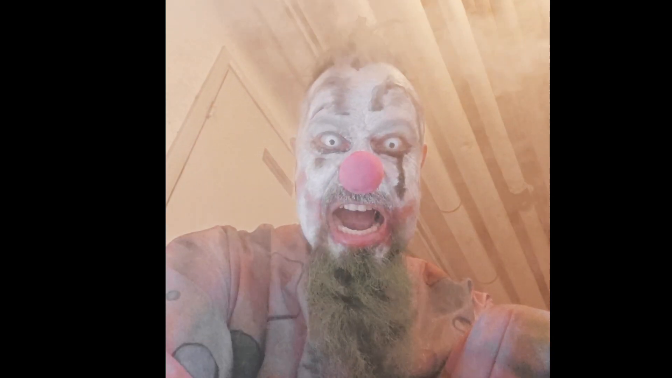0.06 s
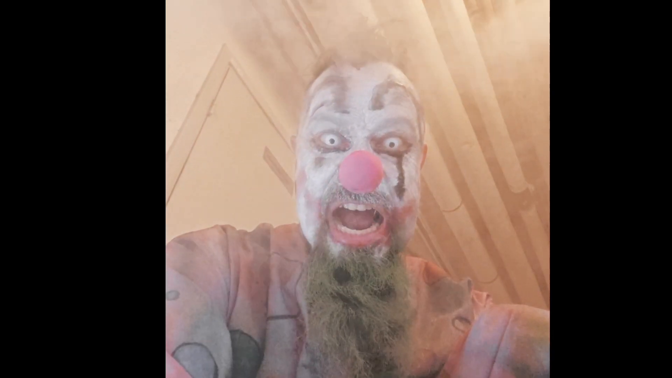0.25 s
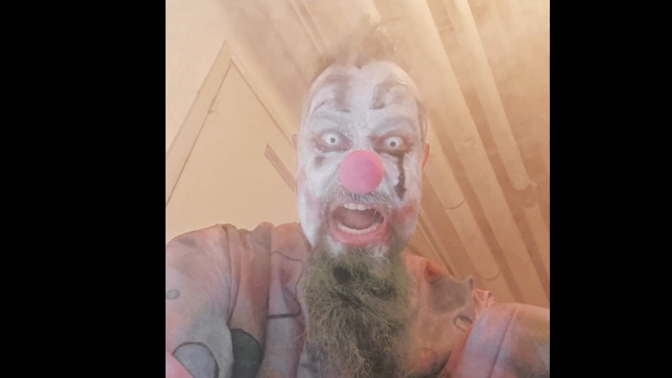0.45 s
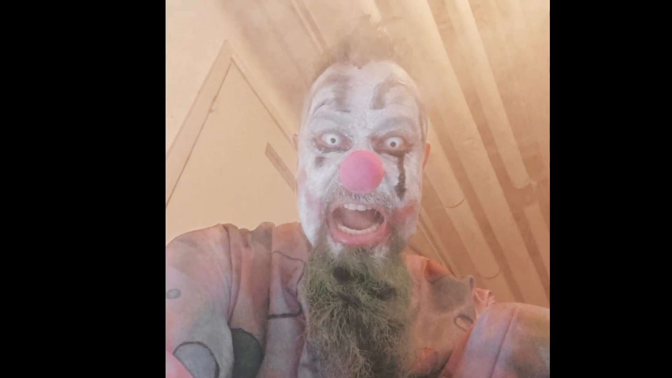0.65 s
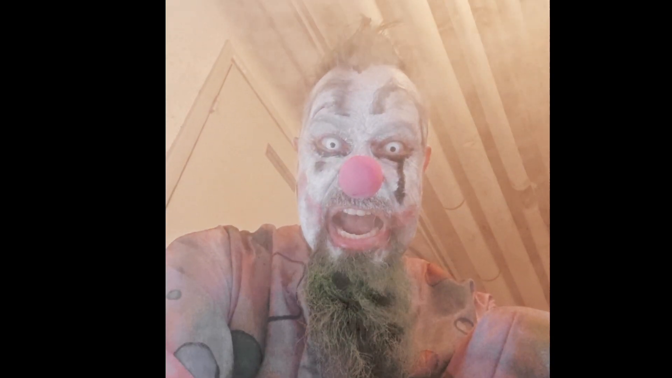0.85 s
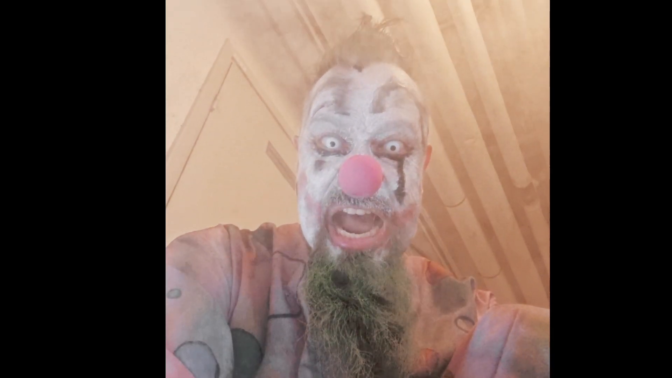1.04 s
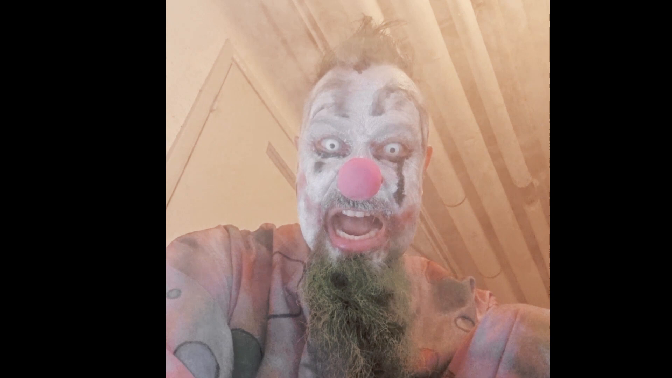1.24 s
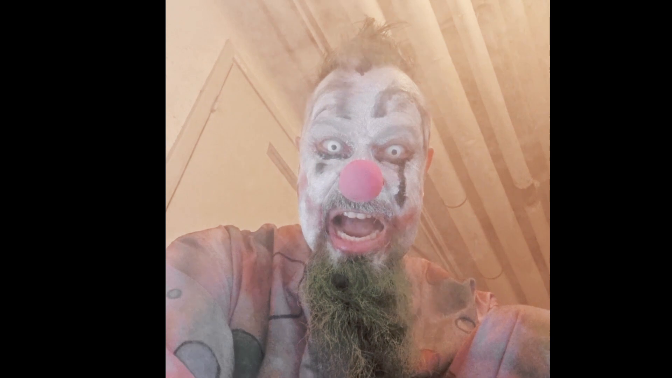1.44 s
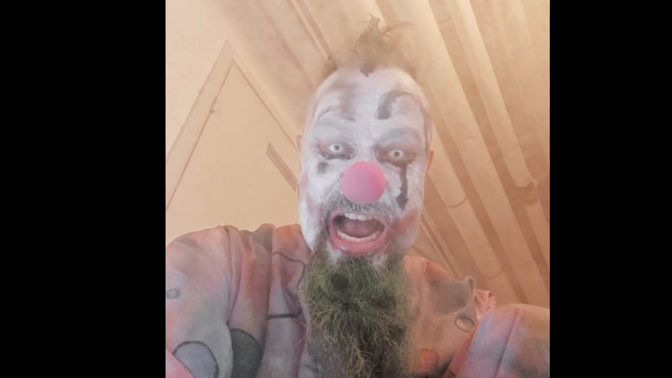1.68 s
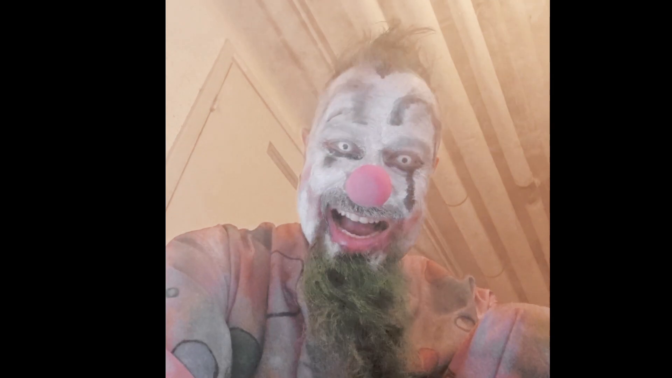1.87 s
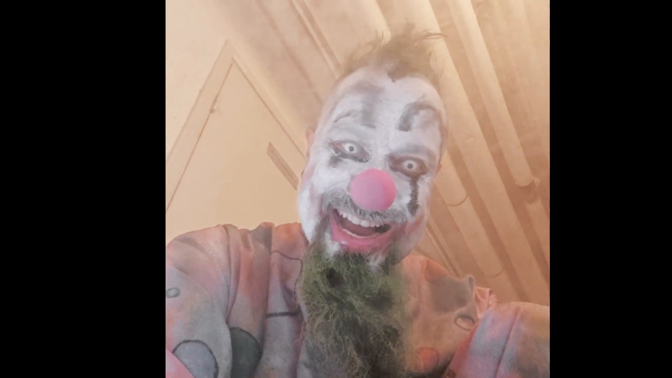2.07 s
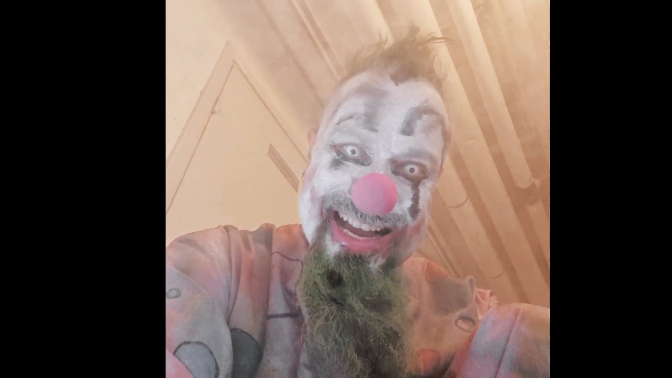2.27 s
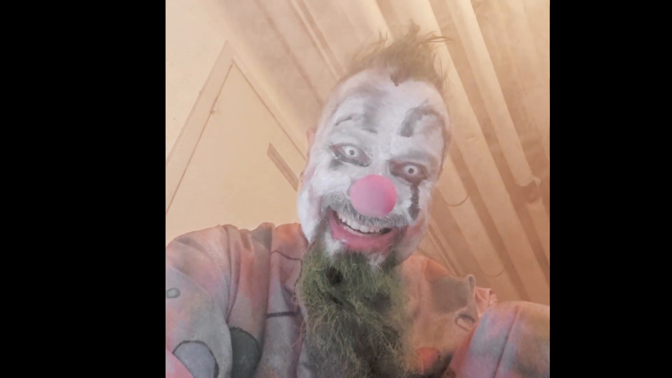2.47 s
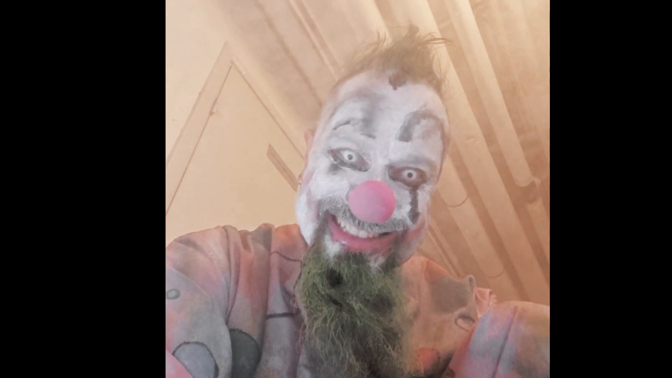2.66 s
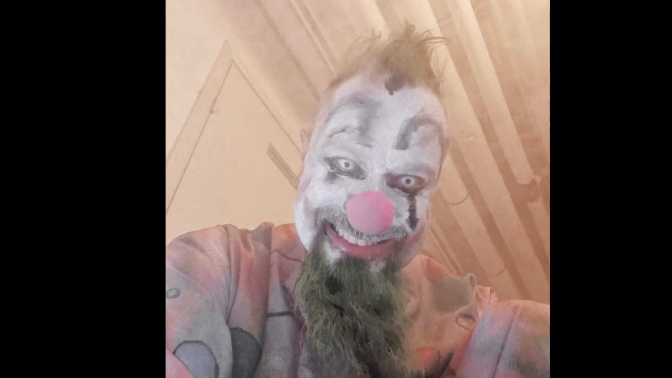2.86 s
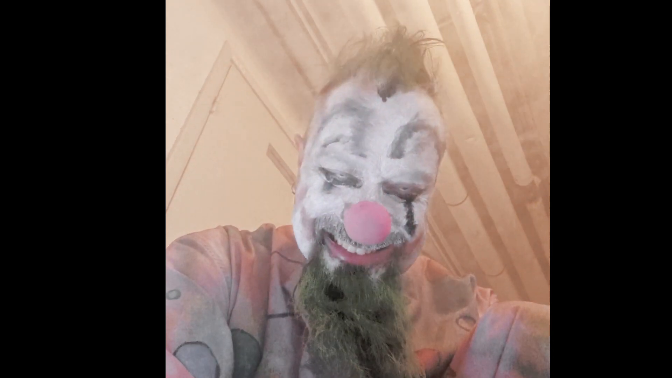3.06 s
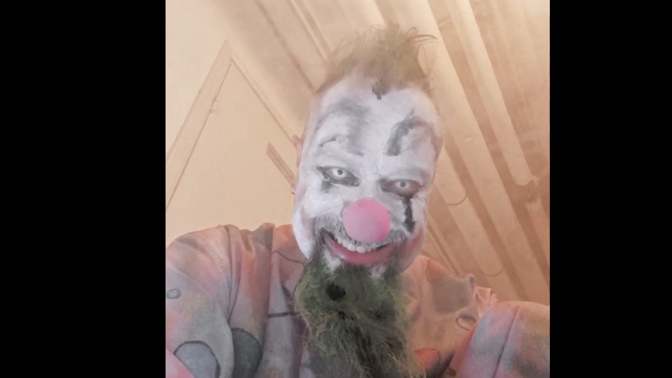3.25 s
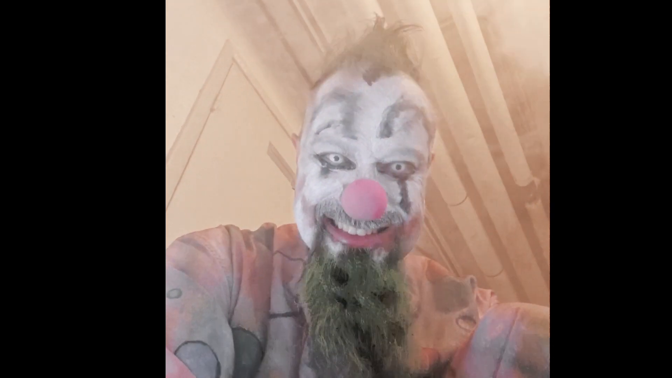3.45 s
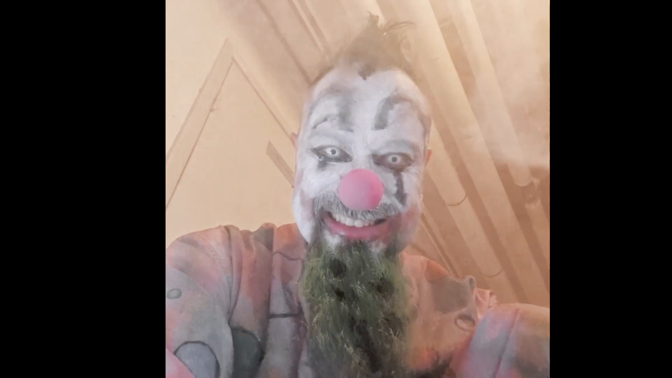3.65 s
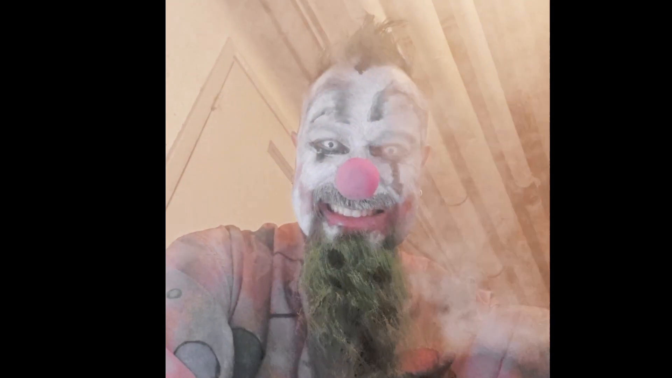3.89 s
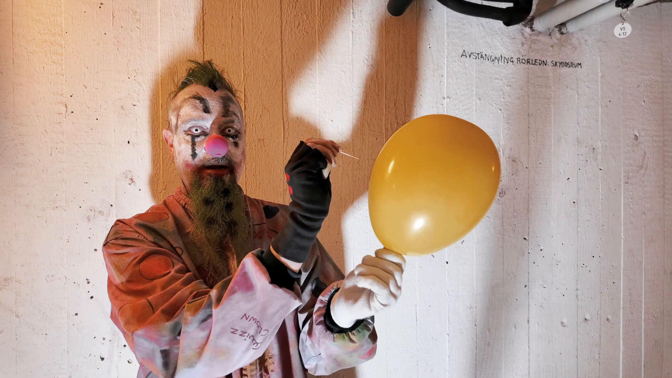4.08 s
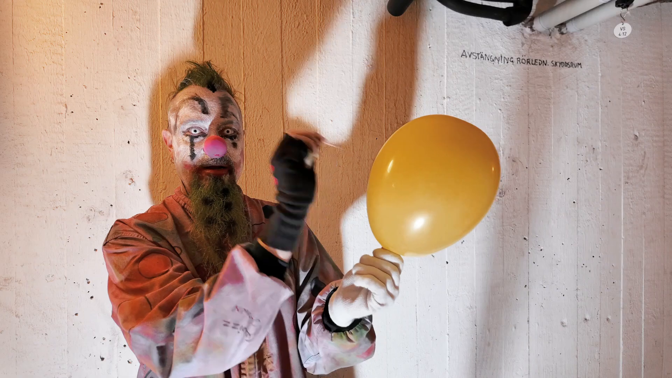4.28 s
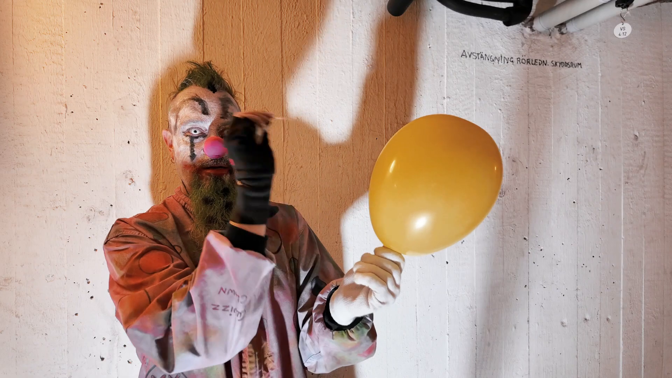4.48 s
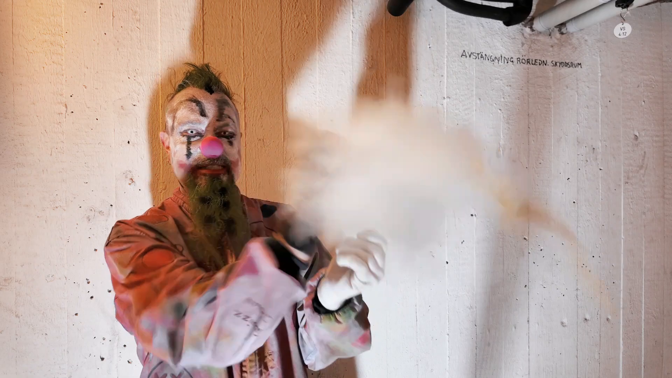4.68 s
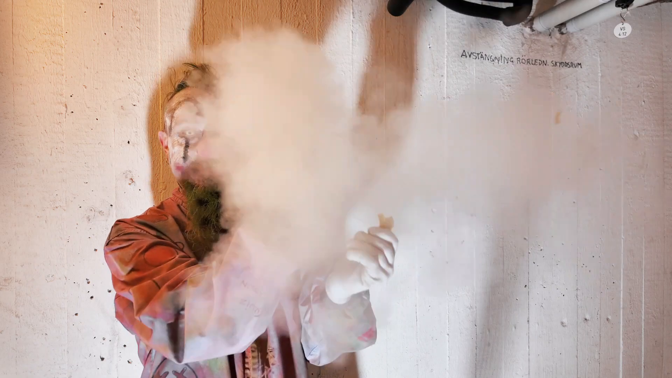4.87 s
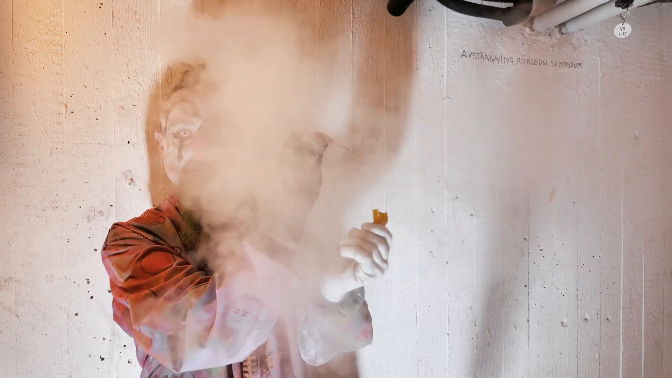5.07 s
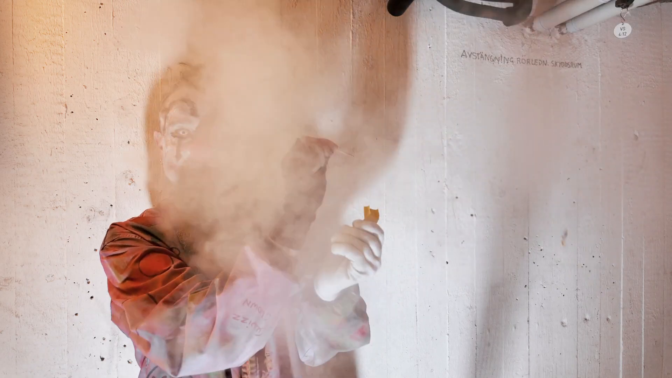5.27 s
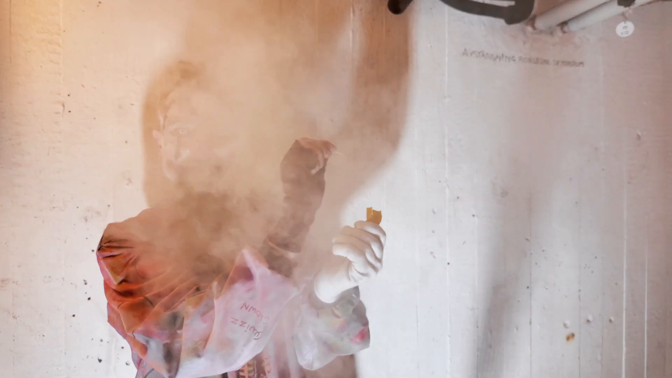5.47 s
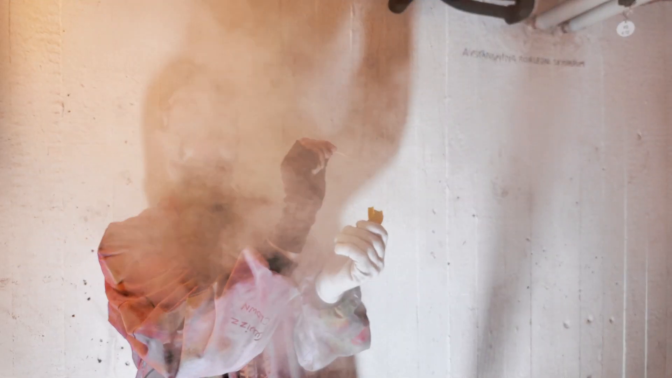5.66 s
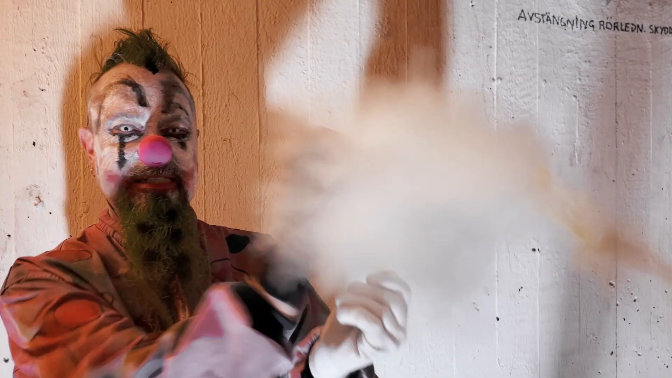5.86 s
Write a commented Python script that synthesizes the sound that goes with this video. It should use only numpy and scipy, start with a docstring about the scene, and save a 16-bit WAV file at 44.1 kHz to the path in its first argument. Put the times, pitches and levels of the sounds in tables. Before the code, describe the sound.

Steady rattling pump buzz with nozzle hiss stops abruptly; near silence, one loud balloon bang with a boomy echo, then the buzz returns.

```python
"""A quiet concrete room, and close by a handheld smoke machine, heard before and after it.
The machine's piston pump knocks about 105 times a second, as shaped harmonics, under the nozzle's filtered noise.
It swings round, turns harder in tone and is cut off dead. In the room faint narrow-band noise swells, then a
balloon bursts: noise bursts, a pressure pulse and a decaying echo that a limiter holds flat; scraps of rubber land.
Then the buzz of the machine cuts back in."""
import sys
import numpy as np
from scipy import signal
from scipy.fft import irfft, next_fast_len
from scipy.io import wavfile
from scipy.ndimage import uniform_filter1d, map_coordinates

SR = 44100
rng = np.random.default_rng(int(sys.argv[2]) if len(sys.argv) > 2 else 0)


def waveform_to_disk(signal):
    """Save audio, clipped to [-1, 1], as 16-bit WAV at the path in sys.argv[1]."""
    frames = np.transpose(np.atleast_2d(signal))
    scaled = np.clip(frames, -1, 1) * 32767
    samples = np.round(scaled).astype(np.int16)
    wavfile.write(sys.argv[1], SR, samples)


N = 261501
TIME = np.arange(N) / SR
PUMP_HZ = 105.353
BURST_S = 4.7862


def gain_of(db):
    """Decibels to an amplitude factor."""
    return 10 ** (np.asarray(db) / 20)


def evened(x):
    """Scales to rms 1."""
    return x / np.sqrt(np.mean(abs(x) ** 2) + 1e-20)


def read(points, hz):
    """Interpolates a table on a log-frequency axis."""
    point_hz, value = np.transpose(points)
    return np.interp(np.log(hz + 1), np.log(point_hz + 1), value)


def chance(*shape):
    """Complex normal numbers of rms 1."""
    return evened(rng.standard_normal(shape) + 1j * rng.standard_normal(shape))


# left-right likeness of the sound field [freq_hz, correlation]
LIKENESS = [(60, 0.99), (250, 0.97), (600, 0.87), (1300, 0.53), (2400, -0.24), (4400, 0.12), (6500, 0.19),
            (8500, 0.86), (15000, 0.87)]


def paired(fields, hz):
    """Mixes two unrelated fields into a left-right pair with the tabled likeness."""
    same = np.clip(read(LIKENESS, hz), -1, 1)
    right = same * fields[0] + np.sqrt(1 - same ** 2) * fields[1]
    return np.array([fields[0], right])


def noise(colour, count=N):
    """Stereo noise of rms 1; colour(hz) gives the relative gain."""
    size = next_fast_len(count, True)
    hz = np.fft.rfftfreq(size, 1 / SR)
    spectrum = paired(chance(2, len(hz)), hz) * colour(hz)
    return evened(irfft(spectrum, size)[:, :count])


def wavering(centre_hz, width_hz):
    """Noise in one narrow resonance: an unsteady tone."""
    return noise(lambda hz: 1 / (1 + (2 * (hz - centre_hz) / width_hz) ** 2))


def rasps(rows, low_hz):
    """Noise bursts with a linear rise and an exponential decay."""
    out = np.zeros((2, N))
    age_s = np.arange(SR // 3) / SR
    for start_s, level_db, rise_s, t60_s, corner_hz in rows:
        decay_db = -60 * np.maximum(age_s - rise_s, 0) / t60_s
        swell = np.minimum(age_s / rise_s, 1) * gain_of(level_db + decay_db)
        hiss = noise(lambda hz: hz / np.hypot(hz, low_hz) / np.hypot(1, hz / corner_hz), len(age_s))
        part = out[:, round(start_s * SR):][:, :len(age_s)]
        part += (swell * hiss)[:, :part.shape[1]]
    return out


# wash of the quiet room [freq_hz, relative_db_per_hz]
AIR = [(18, -53.5), (30, -20), (59, -10.5), (168, -8), (213, -4), (270, -8.5), (467, -17.5), (656, -17.5),
       (728, -13), (830, -19), (1020, -20), (1200, -21), (4700, -30.5), (7700, -37.5), (11500, -37.5),
       (15500, -31.5)]
AIR_DB = -66.5
# ventilation drone [centre_hz, width_hz, level_db]
DRONE = [(72, 8.7, -74.5), (131.5, 10, -68.5), (208.7, 32, -65), (657, 8, -84), (735, 9.3, -76)]


def room_air():
    """Faint broadband wash plus the wavering narrow bands of ventilation."""
    drone = sum(gain_of(level_db) * wavering(centre_hz, width_hz) for centre_hz, width_hz, level_db in DRONE)
    return gain_of(AIR_DB) * noise(lambda hz: gain_of(read(AIR, hz))) + drone


def low_drone(centre_hz=143, width_hz=14, level_db=-67):
    """Low ventilation drone under the machine, as narrow noise."""
    return gain_of(level_db) * wavering(centre_hz, width_hz)


# scraps of rubber landing [start_s, level_db, rise_s, t60_s, treble_corner_hz]
SCRAPS = [(5.168, -68.5, 0.0052, .12, 13800), (5.413, -58, 0.016, 0.078, 12050),
          (5.425, -49.5, 0.012, 0.28, 2150), (5.58, -74, 0.0048, 0.13, 14000)]


def scraps():
    """Rubber scraps land: short noise bursts thinned in the bass."""
    return rasps(SCRAPS, low_hz=1500)


# diffuse echo colour [freq_hz, relative_db_per_hz]
ECHO = [(30, -40.5), (55, -19), (75, -15), (130, -5), (230, -3), (350, -2), (520, -8), (800, -6.5),
        (1450, -4.5), (2000, -11), (2500, -12.5), (3200, -16), (6000, -21), (15000, -28.5)]
ECHO_DB = -1
# diffuse echo decay [freq_hz, t60_s]
ECHO_T60 = [(60, 1.2), (250, 1.09), (500, 1), (1000, 0.79), (1600, 0.74), (2400, 0.65), (3500, 0.58),
            (6000, 0.45), (10000, .34), (15000, 0.2)]
# standing waves between the walls [freq_hz, level_db, t60_s]
ROOM_MODES = [(124.7, -26.5, 1.7), (144.2, -16.5, 0.88), (208.1, -9, 1.07), (243.5, -11.5, 1.334),
              (324, -8, 0.83), (369, -14, 1.04), (496, -28.5, 1.4), (679, -25, 1.0), (765, -24, 1.0),
              (842, -23.5, 1.0), (1346, -25.5, 1)]


def echo(build_s=0.00072):
    """Bare walls keep the bang alive: a diffuse tail that loses its treble first, and standing waves."""
    hz, t, z = signal.stft(noise(lambda hz: gain_of(read(ECHO, hz))), SR, nperseg=512)
    fade_db = ECHO_DB - 60 * np.maximum(t - BURST_S, 0) / read(ECHO_T60, hz)[:, None]
    tail = signal.istft(z * gain_of(fade_db), SR, nperseg=512)[1][:, :N]
    age_s = np.maximum(TIME - BURST_S, 0)
    waves = np.zeros(N)
    for freq_hz, level_db, t60_s in ROOM_MODES:
        waves += gain_of(level_db - 60 * age_s / t60_s) * np.sin(2 * np.pi * (freq_hz * age_s + rng.random()))
    return (tail + waves) * np.minimum(age_s / build_s, 1)


# faint swells just before the bang [start_s, end_s, centre_hz, width_hz, level_db]; level before the swell
PRELUDE = [(4.749, 4.784, 190, 65, -39), (4.749, 4.784, 735, 76, -39), (4.749, 4.783, 2600, 600, -47)]


def prelude():
    """A faint narrow-band noise swell just before the bang, under half-sine envelopes."""
    out = np.zeros((2, N))
    for start_s, end_s, centre_hz, width_hz, level_db in PRELUDE:
        swell = np.sin(np.pi * np.clip((TIME - start_s) / (end_s - start_s), 0, 1))
        out += gain_of(level_db) * swell * wavering(centre_hz, width_hz)
    return out


# noise of the bang, led by a soft rumble and a tick; level before the left-right tilt
# [start_s, level_db, rise_s, t60_s, treble_corner_hz]
BANG_NOISE = [(4.749, -40.5, 0.022, 0.28, 298.8), (4.7772, -14.5, 0.0011, 0.0022, 1103),
              (4.7842, -9.5, 0.0052, 0.022, 13980), (4.7862, 1, 0.00058, 0.036, 3500),
              (4.7912, 4.5, 0.00037, 0.016, 1190)]


def bang_noise(right_db=1.5):
    """Noise bursts of the bang, led by a soft rumble and a tick, stronger on the right."""
    return rasps(BANG_NOISE, low_hz=150) * gain_of([[-right_db], [right_db]])


# blast and nearest echoes [start_s, pulse_scale_db, push_s]
BLASTS = [(4.787, 16, 0.0013), (4.7909, 11.5, 0.00096), (4.7948, 11, 0.0013)]


def blast(ring_hz=290, ring_db=7, ring_t60_s=0.044):
    """The freed air pushes out, sucks back and swings as a decaying sine."""
    out = np.zeros(N)
    for start_s, scale_db, push_s in BLASTS:
        u = np.maximum(TIME - start_s, 0) / push_s
        out += gain_of(scale_db) * (1 - u) * np.exp(-u) * np.minimum(u / 0.25, 1)
    age_s = np.maximum(TIME - BURST_S, 0)
    return out + gain_of(ring_db - 60 * age_s / ring_t60_s) * np.sin(2 * np.pi * ring_hz * age_s)


# droplets in the nozzle [start_s, level_db]
SPITS = [(3.378, -68), (3.44, -70), (3.618, -63), (3.648, -66), (3.678, -65), (3.704, -72), (3.726, -67)]


def spits(rise_s=.003, t60_s=.07, corner_hz=8860):
    """Droplets of fluid sputter in the hot nozzle: short noise bursts."""
    rows = [(start_s, level_db, rise_s, t60_s, corner_hz) for start_s, level_db in SPITS]
    return rasps(rows, low_hz=2000)


# middle and duration of the machine's one swing
TURN_S, TURN_TAKES_S = 3.36, .56


def turned(t):
    """How far the machine has swung round: 0 = aside .. 1 = facing."""
    return .5 + .5 * np.sin(np.pi * np.clip((t - TURN_S) / TURN_TAKES_S, -.5, .5))


# machine treble, used relative to the table's mean [time_s, treble_db]
TREBLE = [(0.03, -61.5), (0.88, -60.5), (0.91, -64.5), (0.95, -63), (1.78, -63), (3.1, -65), (3.75, -59)]
# how far each frequency follows it [freq_hz, share]
BEAMED = [(1000, 0.05), (2200, 0.64), (3400, 0.34), (7000, 1), (11000, 0.1)]


def aimed(t, hz):
    """The treble is beamed, so it varies as the machine moves: dB by time and frequency."""
    time_s, treble_db = np.transpose(TREBLE)
    return np.outer(np.interp(t, time_s, treble_db - treble_db.mean()), read(BEAMED, hz))


# machine balance between the microphones [freq_hz, left_minus_right_db]
LEAN = [(100, -2.5), (300, -2.5), (1500, -0.5), (2400, -6), (4400, -2), (5500, -2), (15000, 1)]


def leaning(hz):
    """Left and right gains for the machine, held mostly to the right."""
    return gain_of(np.array([[.5], [-.5]]) * read(LEAN, hz))


# knock's change when the machine faces the microphones [freq_hz, change_db]
FRONT = [(400, -2), (1100, -0.5), (1600, 6), (2100, 2), (2600, 4.5), (3300, -1.5), (4000, -6.5), (7000, 0),
         (11000, 2)]


def front_db(hz):
    """Spectral change of the knock from aside to facing."""
    return read(FRONT, hz)


# nozzle hiss and rumble [freq_hz, relative_db_per_hz]
HISS = [(25, -13), (70, -1.5), (110, -5.5), (200, -3), (380, -9.5), (520, -8.5), (750, -11), (1000, -7),
        (1350, -8), (2000, -10), (3000, -11), (6800, -24), (8300, -34.5), (15000, -38.5)]
HISS_DB = -58  # before wander, aim and throb


def nozzle(patchy_db=2.5, front_share=0.21):
    """Vapour hisses out, throbbing at the pump rate; its colour wanders with the turbulent jet."""
    hz, t, z = signal.stft(noise(lambda hz: gain_of(read(HISS, hz)) * leaning(hz)), SR, nperseg=1024)
    grain = uniform_filter1d(rng.standard_normal(z.shape[1:]), size=7, axis=0)
    patches = evened(uniform_filter1d(grain, size=25, axis=1))
    wander_db = patchy_db * patches * read([(200, 0.68), (1500, 1)], hz)[:, None]
    facing_db = front_share * np.outer(front_db(hz), turned(t))
    shaped = z * gain_of(wander_db + facing_db + aimed(t, hz).T)
    hiss = signal.istft(shaped, SR, nperseg=1024)[1][:, :N]
    throb = 1 + .2 * np.cos(2 * np.pi * PUMP_HZ * TIME)
    return gain_of(HISS_DB) * hiss * throb


# dull part of each knock [freq_hz, base_db_per_harmonic]
THUD = [(105, -72), (420, -77.5), (740, -66.5), (850, -71.5), (1200, -65), (1600, -69), (1800, -74.5),
        (2200, -73), (2450, -82.5), (2650, -110)]
# upper harmonics [freq_hz, base_db_per_harmonic]
BUZZ = [(2300, -86), (2800, -73), (3500, -77.5), (4000, -77), (4400, -103), (4900, -81), (5400, -84.5),
        (6300, -83.5), (7200, -80.5), (8200, -102), (10000, -96), (10800, -101.5), (12000, -105),
        (15000, -112)]
# narrow casing rings, machine aside [centre_hz, above_buzz_db]
CASING = [(2420, 6), (2740, 9), (3265, 5), (3480, 7), (5265, 9), (5370, 12), (5585, 8), (5900, 7),
          (6005, 7), (6320, 11), (7900, 10), (10535, 8), (10850, 13), (11165, 9)]
# levels and left-right balance of single pump harmonics, strong or weak, against the knock; leads of left over right
# [centre_hz, aside_db, facing_db, left_minus_right_db, lead_aside_rad, lead_facing_rad]
SINGLES = [(316, 17, 18.5, -5.5, -0.9, 0.6), (527, 3.5, -0.5, -11, 1.5, -8.5), (632, 7.5, 16, 5, 0.43, 0.5),
           (948, 14, 8.5, -12.5, 0.07, 1.6), (1054, 13.5, 7.5, 0.5, 1.03, 1), (1264, 2, 10, -10, -2.7, 0.9),
           (1380, 2, 2, 0, 1.1, 1.5), (1475, 9.5, 7.5, -4, -2.5, -1.5)]
SINGLE_WIDTH_HZ = 70
DIRECT_SMEAR = .25  # share of reflection smear left below 4 kHz when facing


def harmonics(t, hz, buzz_db=0.0, uneven_db=3.57, smear_size=0.89, ears_apart=1.0):
    """Spectrum of one knock, changing with the turn: complex harmonics by ear and time."""
    facing, ears = turned(t)[:, None], np.array([.5, -.5])[:, None, None]
    single_hz, aside_db, facing_db, pan_db, lead_aside, lead_facing = np.transpose(SINGLES)
    near = 1 / (1 + (2 * (hz - single_hz[:, None]) / SINGLE_WIDTH_HZ) ** 4)
    between = np.clip(1 - near.sum(0), 0, 1)
    singles_db = ((1 - facing) * aside_db + facing * facing_db + ears * pan_db) @ near
    # the lower casing rings fade as the machine turns to face
    rings_db = sum(db / (1 + ((hz - centre_hz) / 30) ** 2) for centre_hz, db in CASING)
    rings_db = rings_db * (1 - np.sqrt(facing) * (hz < 4000))
    knock_db = np.maximum(read(THUD, hz), read(BUZZ, hz) + buzz_db)
    knock_db = knock_db + aimed(t, hz) + facing * front_db(hz)
    ragged_db = uneven_db * between * rng.standard_normal(len(hz))
    size = leaning(hz)[:, None] * gain_of(knock_db + singles_db + rings_db + ragged_db)
    # causal ring: phase from the Hilbert transform of the log magnitude
    both = np.log(size.mean(0))
    causal = -signal.hilbert(np.hstack([both, both[:, :0:-1]])).imag[:, :len(hz)]
    # reflections smear it, less so once the knock arrives directly
    indirect = 1 - facing * (1 - DIRECT_SMEAR) * (hz < 4000)
    smear_rad = smear_size * read([(300, 0.71), (1500, 1.7), (3200, 3.0), (5500, 1.63)], hz)
    smear = smear_rad * rng.standard_normal(len(hz))
    # random phase gap between the microphones, by frequency
    apart_rad = read([(300, 0.6), (1500, 2.4), (2400, 1.07), (4500, 1.62), (6000, 0.48), (8500, 0.14)], hz)
    apart = ears_apart * between * apart_rad * rng.standard_normal((2, 1, len(hz)))
    phase = causal + indirect * (smear + apart)
    phase[0] += ((1 - facing) * lead_aside + facing * lead_facing) @ near
    return size * np.exp(1j * phase)


# reflections that shift as the hand moves [freq_hz, base_db_per_harmonic]
SHIFTING = [(100, -77), (500, -103), (1000, -85.5), (1400, -76), (2000, -98.5), (3000, -95), (4400, -121),
            (6000, -72), (7300, -89.5), (8300, -106), (15000, -114)]
KNOCK_S = 5.7594  # nominal time of one knock, before jitter


def pump(drift_hz=1.73, jitter_cycles=0.0012, shake_db=0.73, trim_db=-0.53):
    """The piston knocks steadily; reflections that shift with the hand make its weaker harmonics swim."""
    t = np.linspace(0, N / SR, 240)
    hz = PUMP_HZ * np.arange(150)
    low_pass = signal.butter(2, drift_hz, fs=1 / t[1])
    # the first half only settles the filter
    slow = signal.lfilter(*low_pass, chance(2, 2 * len(t), len(hz)), axis=1)[:, len(t):]
    lines = harmonics(t, hz) + gain_of(read(SHIFTING, hz)) * paired(evened(slow), hz)
    cycle = irfft(lines * (hz > 0), 2048) * 2048 / np.sqrt(2)
    # no two strokes are quite alike in timing or force
    strokes = TIME * PUMP_HZ + (-KNOCK_S * PUMP_HZ) % 1
    draws = rng.standard_normal((2, int(strokes[-1]) + 2))
    late, force = (np.interp(strokes + .5, np.arange(len(r)), r) for r in draws)
    place = [TIME / t[1], (strokes + jitter_cycles * late) % 1 * cycle.shape[2]]
    wave = np.array([map_coordinates(c, place, order=1, mode="nearest") for c in cycle])
    return wave * gain_of(trim_db + shake_db * force)


def heard(spans):
    """1 inside the spans and 0 outside, with abrupt edges."""
    inside = sum(1. * ((TIME > start_s) & (TIME < end_s)) for start_s, end_s in spans)
    return uniform_filter1d(inside, size=40)


# when the machine is heard [start_s, end_s]
PUMP_ON = [(-.1, 3.778), (5.7505, 6.1)]
# when the room is heard [start_s, end_s]
ROOM_ON = [(3.988, 5.7505)]


def scene(low_cut_hz=52):
    """The machine, the balloon in its room, the machine again."""
    room = room_air() + scraps() + echo() + prelude() + bang_noise() + blast()
    room = signal.sosfilt(signal.butter(3, low_cut_hz, "highpass", fs=SR, output="sos"), room)
    machine = low_drone() + spits() + nozzle() + pump()
    return room * heard(ROOM_ON) + machine * heard(PUMP_ON)


EDGE_HZ = 15900


def record(dry, limit_db=-23, range_db=16, ratio=8, sense_s=0.0045):
    """A limiter of finite range holds the echo level; the blast overloads; then the band limit."""
    r = np.exp(-1 / (sense_s * SR))
    power = signal.lfilter([1 - r], [1, -r], (dry ** 2).mean(0))
    power_db = 10 * np.log10(power + 1e-12)
    cut_db = np.clip((power_db - limit_db) * (1 - 1 / ratio), 0, range_db)
    held = dry / gain_of(uniform_filter1d(cut_db, size=60))
    clipped = np.clip(held, -.92, .92)
    low_pass = signal.firwin(255, EDGE_HZ, window=("kaiser", 9), fs=SR)
    return signal.oaconvolve(clipped, low_pass[None], "same")


dry = scene()
out = record(dry)
waveform_to_disk(out)
```